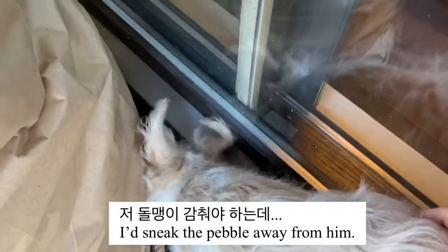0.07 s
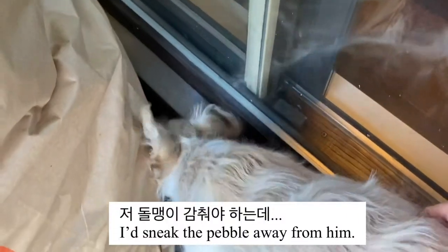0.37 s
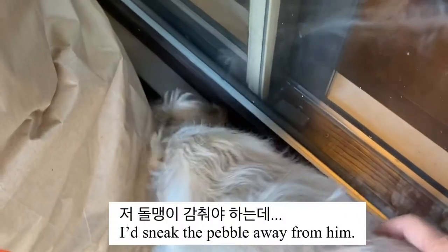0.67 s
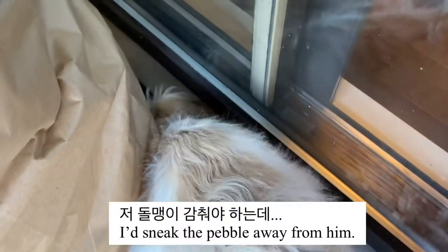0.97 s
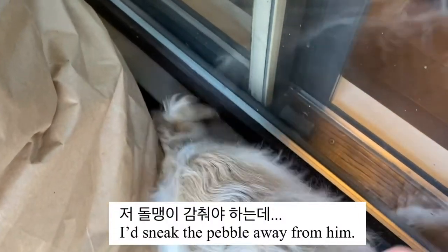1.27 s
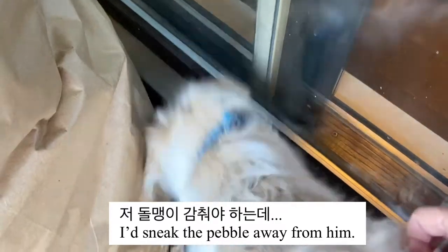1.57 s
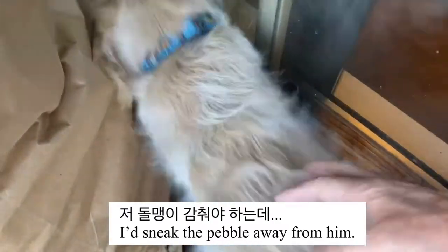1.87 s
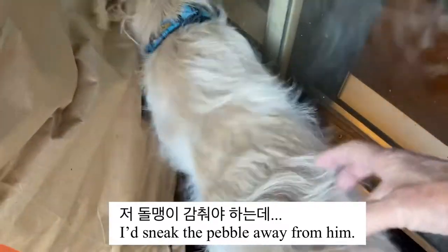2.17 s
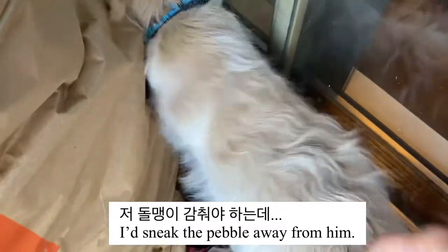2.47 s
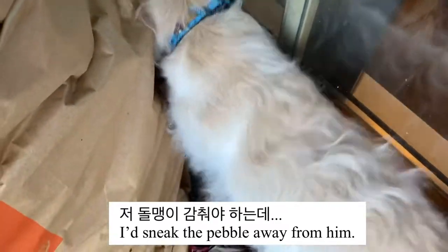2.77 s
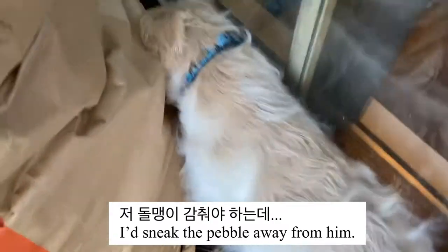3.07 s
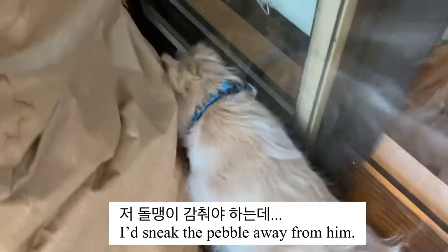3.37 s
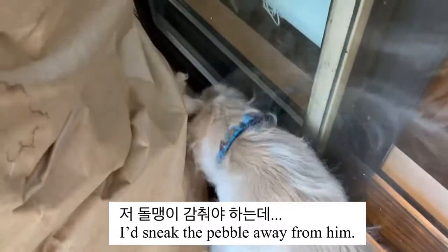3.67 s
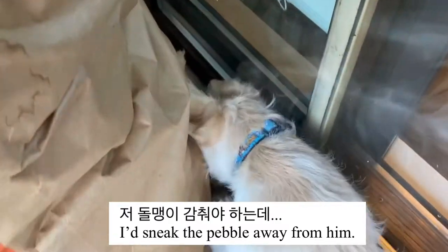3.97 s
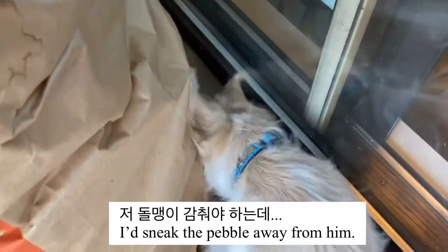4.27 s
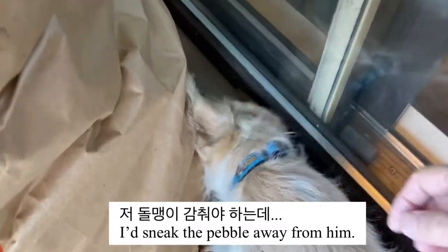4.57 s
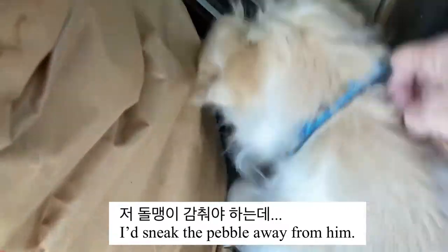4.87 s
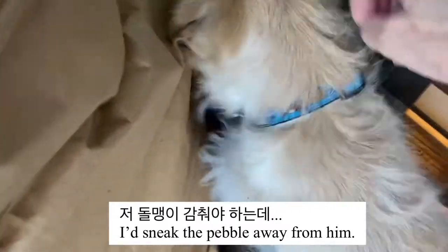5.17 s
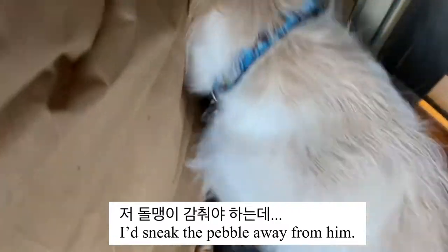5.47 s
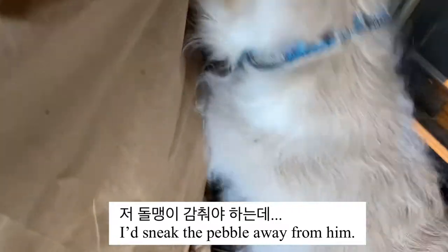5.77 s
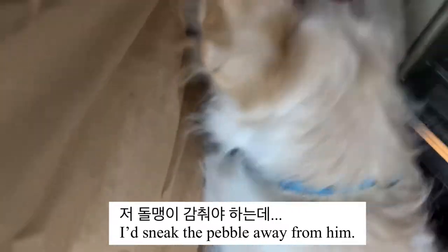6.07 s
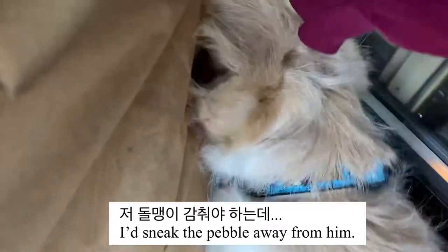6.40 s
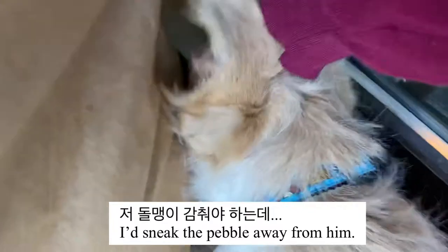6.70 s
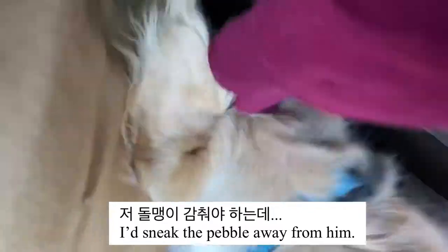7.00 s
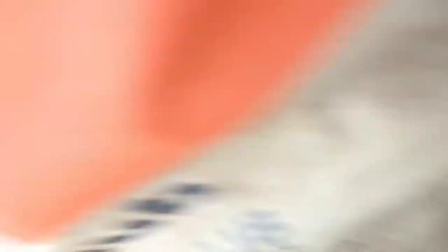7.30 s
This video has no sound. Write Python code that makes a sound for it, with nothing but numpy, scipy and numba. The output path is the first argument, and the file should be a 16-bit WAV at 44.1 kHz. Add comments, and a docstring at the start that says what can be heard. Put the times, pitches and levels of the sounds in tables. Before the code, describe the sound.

A puppy squeezes between a glass door and a big paper bag, very close to a hand-held phone. The stiff paper rustles and crinkles in uneven bursts, with sharp pops, dull paw taps and low thumps, while fur hisses along it. The pushing starts lightly, grows busier, eases briefly, then peaks before softening. A few dull knocks sound, and a low rumble lies under the small room.

```python
"""Puppy behind a paper bag

A puppy squeezes and paws between a glass door and a big paper bag, right under a hand-held phone.
The stiff paper buckles with sharp pops, dull taps and low thumps, and crinkles and flaps when pushed.
Fur hisses along it. A few dull knocks sound, probably a pebble or claws on the door track.
A small room and a low rumble lie behind. The phone's two microphone ports hear it all slightly apart."""
import sys
import numpy as np
from scipy import signal
from scipy.fft import rfft, irfft, next_fast_len
from scipy.io import wavfile
from scipy.ndimage import uniform_filter1d
from numba import njit

SR = 44100
rng = np.random.default_rng(int(sys.argv[2]) if len(sys.argv) > 2 else 0)


def inscribe(sig):
    """Save sig as 16-bit PCM at rate SR to the path in sys.argv[1].

    A 1-D sig is mono; a 2-D sig holds one channel per row.
    Samples are clipped to [-1, 1] before scaling.
    """
    pcm = np.round(np.clip(np.atleast_2d(sig).T, -1, 1) * 32767)
    wavfile.write(sys.argv[1], SR, pcm.astype(np.int16))


N = 332514
TIME_S = np.arange(N) / SR
TOP_HZ = 15800
WALL_HZ, WALL_BEND_OCT = [805, 1415, 2090, 3910], .16  # bag wall resonances at rest; rms slide

# sharp paper pops and dull knocks, the knocks probably a pebble or claws on the door track:
# t/s, level/dB, treble re level/dB, burst length/s, ring f/Hz
POPS_AND_KNOCKS = [(.3056, -39.5, 2, 0.0012, 347), (.341, -48, 5, 0.00087, 890),
                   (.4723, -36, 3, 0.003, 596), (.7788, -34, -5.5, 0.002, 910),
                   (.8663, -40, -1, 0.0019, 540), (1.0482, -43.5, -44, 0.0011, 755),
                   (1.1516, -35.5, -48, 0.0052, 1163), (1.228, -43.5, -43, 0.005, 530),
                   (1.4603, -48.5, 6, 0.0054, 1024), (1.5892, -30, -12, 0.0055, 1029),
                   (1.618, -34, -22, 0.0036, 1120), (1.644, -32.5, -4, 0.007, 1270),
                   (1.6653, -36.5, 0.5, 0.0021, 396.6), (1.993, -31, -9, 0.0032, 616),
                   (2.0117, -24, -8, 0.0037, 1755), (2.0165, -26, -34, .009, 995),
                   (2.0734, -26, 0, 0.002, 796), (2.214, -38, -14, 0.0016, 1700),
                   (2.2414, -35, -9, 0.0055, 300), (2.351, -37, -12, 0.005, 690),
                   (2.656, -37.5, -20, 0.0025, 412), (2.7206, -28.5, -13, 0.0052, 900),
                   (2.7865, -32, -4, 0.0057, 407), (3.046, -38, -12, 0.0021, 1280),
                   (3.1043, -29, -16, 0.0045, 590), (3.1519, -32.5, 4, 0.0019, 390),
                   (3.191, -39, -3, .003, 1508), (3.505, -43, 7, 0.0039, 507),
                   (3.5375, -40, 7.5, 0.0069, 782), (3.592, -41.5, -25, 0.0039, 520),
                   (3.7005, -44, -15, 0.0053, 747), (3.9059, -43, -53, 0.0018, 625),
                   (4.292, -46, -6.5, 0.0013, 1293), (4.3234, -37, -26, 0.0058, 653),
                   (4.358, -46.5, -1, 0.0046, 1560), (4.4187, -42.5, 4, 0.0043, 943),
                   (4.6073, -33, -23, 0.0028, 656), (4.7357, -34, -6.5, 0.0034, 2205),
                   (4.876, -28.5, -6, 0.0045, 1220), (4.902, -35, -2, 0.0037, 1506),
                   (4.918, -29.5, 0, 0.0021, 520), (4.9496, -25, -15, 0.0063, 1491),
                   (4.9713, -29, 4.5, 0.0022, 526), (5.0207, -32.5, -3, 0.0015, 380),
                   (5.092, -27, -10.5, 0.0043, 674), (5.1204, -17, -9.5, 0.0034, 708),
                   (5.2171, -40, 5, 0.0022, 436), (5.2893, -35.5, -3, 0.0025, 2240),
                   (5.3356, -32, -6, 0.0028, 350.1), (5.5112, -19.5, -7, 0.003, 469),
                   (5.8318, -30.5, -20, 0.0037, 486.4), (6.2755, -31.5, -8.5, 0.0029, 1674),
                   (6.3654, -37, -35, 0.00089, 1090), (6.493, -36.5, -12, 0.0019, 1380),
                   (6.647, -48.5, 13.5, 0.0025, 374), (6.6787, -33, -5, 0.0015, 278),
                   (6.876, -43.5, 4.5, .003, 2330), (6.9194, -27.5, -6, 0.0033, 660),
                   (6.947, -33.5, -1.5, 0.0014, 640), (7.1257, -32.5, -15.5, 0.0028, 756)]
# paw pads landing on paper: t/s, level/dB, panel f/Hz
PAW_TAPS = [(.521, -37.5, 629), (.627, -35, 693), (.726, -36, 636), (.987, -42, 516.8), (1.967, -29, 762.5),
            (3.07, -24.5, 637.8), (4.046, -44, 769), (5.0, -23, 885), (5.209, -27.5, 644),
            (5.761, -40, 830), (5.957, -40, 780)]
# bumps against the bag wall: t/s, peak level/dB, f/Hz
WALL_THUMPS = [(.561, -20, 98), (0.649, -22.5, 348), (1.596, -14, 76), (1.672, -16, 80),
               (2.244, -15.5, 147), (2.327, -18, 228), (2.723, -9.5, 147), (2.769, -10, 144),
               (3.062, -15.5, 106.9), (3.204, -11.5, 94.06), (3.295, -17, 160), (4.444, -24.5, 344),
               (4.892, -10, 103.9), (4.972, -7, 107), (5.215, -8.5, 136.6), (5.266, -12.5, 102.9),
               (5.478, -6.5, 191), (5.514, -1.5, 99.4), (6.5, -22, 314.6), (6.652, -22, 417.7),
               (6.674, -11.5, 245), (6.684, -14, 84), (6.795, -22.5, 307), (7.289, -20.5, 83.3),
               (7.323, -18.5, 66.6)]
# shoves and paw strokes: t/s, swell/s, length/s, crinkle level/dB, fur level/dB
BAG_PUSHES = [(0.235, 0.018, 0.31, -45, -48.5), (0.549, 0.02, 0.19, -44, -48.5),
              (0.998, 0.027, 0.31, -48.5, -52), (1.077, 0.062, 0.119, -44.5, -41),
              (1.297, 0.03, 0.25, -59, -56), (1.582, 0.013, .09, -33, -37.5),
              (1.684, 0.014, 0.053, -40, -41.5), (1.842, 0.02, 0.1, -38, -43.5),
              (1.921, 0.021, .09, -34.5, -40), (2.013, 0.0087, .07, -40.5, -47),
              (2.123, 0.017, .07, -40, -47.5), (2.223, 0.069, .13, -36.5, -41.5),
              (2.461, 0.022, 0.049, -38, -42.5), (2.547, 0.032, 0.32, -40.5, -46.5),
              (2.634, .02, .15, -36.5, -44), (2.863, 0.0071, 0.098, -37.5, -42.5),
              (3.038, 0.014, 0.049, -28.5, -35), (3.158, 0.018, 0.068, -37.5, -43),
              (3.232, 0.019, 0.081, -39.5, -48), (3.395, 0.03, 0.14, -37.5, -43.5),
              (3.627, .015, 0.02, -51, -45.5), (3.69, 0.015, 1.0, -59, -64),
              (3.828, 0.059, .06, -45.5, -47.5), (3.916, 0.035, 0.06, -48.5, -49),
              (4.019, 0.056, 0.0475, -43.5, -39.5), (4.422, 0.033, 0.041, -47.5, -43),
              (4.701, 0.027, 0.023, -48, -39.5), (4.791, 0.043, 0.0795, -63, -43),
              (4.867, 0.013, 0.08, -32.5, -34), (4.938, 0.019, 0.064, -26.5, -31.5),
              (5.062, 0.028, 0.075, -30.5, -34.5), (5.156, 0.078, 0.35, -33, -38.5),
              (5.451, 0.022, .1, -32.5, -37.5), (5.586, 0.031, 0.209, -48.5, -45.5),
              (5.808, 0.014, .44, -51, -48.5), (6.262, .02, 0.26, -44, -46),
              (6.546, 0.065, 0.1347, -43.5, -46), (6.694, 0.1, 0.168, -46.5, -44),
              (6.9, .026, 0.2, -48.5, -45.5), (7.083, 0.056, 0.15, -55, -50.5),
              (7.249, 0.076, 0.066, -46.5, -40.5)]
# smooth brushing to jerky shoving: crinkle level/dB, level scatter/dB, crease size spread/dB
JERK_BY_LEVEL = [(-39, 2, 2.9), (-31, 3.2, 5)]
# paper panel modes, also used for the knocks: f/main f, level/dB
RING_MODES = [(0.597, -4.5), (1, 0), (1.451, -18.5)]
# air modes inside the bag: f/Hz, level re direct/dB
BAG_AIR_MODES = [(468, -9), (830, -3), (1150, -5)]
# modes of the gap between bag, door and phone: f/Hz, level re direct/dB
GAP_MODES = [(1750, -18.5), (3390, -10.5), (4140, -10.5)]
# source spectra: f/Hz, relative density/dB
CRACK_SPECTRUM = [(300, -20), (700, 5.5), (1500, 7), (2900, 1), (4100, 2), (5500, -5), (9000, -20),
                  (15000, -26)]
CRINKLE_SPECTRUM = [(200, -19), (500, 4.5), (1100, -3), (2000, -10.5), (3000, -11.5), (4200, -18),
                    (7000, -26), (15000, -55)]
FLAP_SPECTRUM = [(60, -14), (130, -4.5), (250, -2), (370, -12.5), (1500, -47.5)]
FUR_SPECTRUM = [(800, 10), (4200, 1.5), (6500, 9), (11000, -1.5), (15000, 0.5)]
RUMBLE_SPECTRUM = [(20, -39), (36, -9), (52, 1), (100, 1), (140, -4), (220, -20), (1500, -45.5)]
# rumble of room and held phone: t/s, level/dB
RUMBLE_LEVELS = [(0.0, -39.5), (3.5, -30.5), (3.74, -39.5), (4.7, -37.5), (5.4, -23.5), (5.7, -35),
                 (7.35, -33.5)]
# left port behind right: f/Hz, phase/rad
PORT_LAG_RAD = [(200, 0), (1800, .1), (3500, .55), (5200, 1.2), (8400, 3), (12000, 3.2), (15500, 5.2)]
# left port over right: f/Hz, level/dB
PORT_TILT_DB = [(250, 0), (550, 2), (3500, 1.5), (8000, 0)]
# scattered sound, unlike at the two ports: f/Hz, level re direct/dB
PORT_SCATTER_DB = [(100, -58), (280, -17.5), (550, -9), (4800, -7), (9000, -56), (12000, -33), (15000, -16)]


def pops_and_knocks(crack_db=1, treble_db=1, cycles=0.74, tail_db=-19, tail_s=0.0096, size=4096):
    """Sharp pops of buckling paper and dull knocks: each a grainy burst with a brief ring."""
    out, t = np.zeros((2, N)), np.arange(size) / SR
    for start_s, db, bright_db, burst_s, hz in POPS_AND_KNOCKS:
        burst = rng.standard_normal((2, size)) * np.exp(.5 * rng.standard_normal(size))
        decay = np.exp(-(t / burst_s) ** 2) + undb(tail_db) * np.exp(-t / tail_s)
        burst *= (1 - np.exp(-2 * t / burst_s)) * decay
        burst += np.roll(burst, int(SR / hz * rng.uniform(0.55, 1)), axis=-1) / 2  # comb colouring
        crack = colour(burst, CRACK_SPECTRUM)
        body = band(crack, 260, 3600 * 2 ** (bright_db / 40))
        body *= burst_gain(band(body, 600, 6900), db + crack_db)
        treble = band(band(crack, 7100, TOP_HZ), 5950, TOP_HZ)
        treble *= burst_gain(treble, db + bright_db + treble_db)
        ring = 0
        for ratio, mode_db in RING_MODES:
            mode = np.sin(2 * np.pi * (ratio * hz * t + rng.random((2, 1))))
            ring_s = cycles / (ratio * hz) + burst_s / 2
            ring += undb(mode_db) * mode * np.exp(-t / ring_s)
        ring *= 1 - np.exp(-2 * hz * t)
        ring_db = db + 4 - 6.5 * np.log2(hz / 603) - 0.18 * bright_db  # low, dull ones ring more
        add(out, start_s, body + treble + ring * burst_gain(ring, ring_db))
    return out


def taps(scuff_db=-6, cycles=1.3, contact_s=0.004, size=4096):
    """A pad presses softly: the panel swings a few times under a short, dull scuff."""
    out, t = np.zeros((2, N)), np.arange(size) / SR
    for start_s, db, hz in PAW_TAPS:
        swing = sum(undb(mode_db) * np.sin(2 * np.pi * ratio * hz * t) * np.exp(-ratio * hz * t / cycles)
                    for ratio, mode_db in RING_MODES)
        swing *= 1 - np.exp(-t / contact_s)
        scuff = band(rng.standard_normal((2, size)) * t * np.exp(-2 * t / contact_s), 300, 1500)
        add(out, start_s, swing * burst_gain(swing, db) + scuff * burst_gain(scuff, db + scuff_db))
    return out


def thumps(rise_cycles=0.7, sag_cycles=0.11, size=6000):
    """The bag wall bulges and settles in a few swings, its pitch sagging as it slackens."""
    out, t = np.zeros(N), np.arange(size) / SR
    for start_s, db, hz in WALL_THUMPS:
        age = hz * t / rise_cycles
        bulge = (age * np.exp(1 - age)) ** 2
        phase_cycles = hz * t + sag_cycles * (1 - np.exp(-age))
        add(out, start_s, undb(db) * bulge * np.sin(2 * np.pi * phase_cycles))
    return out


def push_levels(release_s=.042, rest_db=(-62, -63.5)):
    """Crinkle and fur levels in dB: each push swells, holds and dies back to a faint stirring."""
    power, t = np.zeros((2, N)), np.arange(2 * SR) / SR
    for start_s, swell_s, length_s, *levels_db in BAG_PUSHES:
        shape = np.minimum(t / swell_s, 1) * np.exp(-np.maximum(t - length_s, 0) / release_s)
        add(power, start_s, np.outer(undb(levels_db), shape) ** 2)
    return 10 * np.log10(power + undb(rest_db)[:, None] ** 2)


def creases(rate_hz, spread_db, cycles=2.8, slip_s=.001, flicker_db=2, band_scatter_db=4, octaves=7):
    """Creases slip at random; each rings a few cycles in every octave, at uneven levels."""
    slips = np.flatnonzero(rng.random(N) < rate_hz / SR)
    size_db = spread_db[slips] * (np.minimum(rng.exponential(size=len(slips)), np.pi) - 2)
    out = 0
    for hz in TOP_HZ / np.sqrt(2) / 2 ** np.arange(octaves):
        energy = np.zeros(N)
        energy[slips] = undb(size_db + band_scatter_db * rng.standard_normal(len(slips))) ** 2
        for tau_s in (slip_s / 4, slip_s + cycles / hz):  # rise, fall
            energy = signal.lfilter([1], [1, -np.exp(-2 / (tau_s * SR))], energy)
        envelope = unit_rms(np.sqrt(energy) * undb(flicker_db * walk(30)))
        out += band(envelope * rng.standard_normal((2, N)), hz / np.sqrt(2), hz * np.sqrt(2))
    return out


def rustle(crinkle_db, fur_db, base_rate_hz=330, rate_doubling_db=30, flap_over_crinkle_db=7):
    """Harder pushing creases the paper faster; loose panels flap; sliding fur hisses."""
    rate_hz = base_rate_hz * 2 ** ((crinkle_db - crinkle_db.mean()) / rate_doubling_db)
    level_db, scatter_db, spread_db = np.transpose(JERK_BY_LEVEL)
    jerk = undb(np.interp(crinkle_db, level_db, scatter_db) * walk(45))
    slips = creases(rate_hz, np.interp(crinkle_db, level_db, spread_db))
    crinkle = unit_rms(colour(slips, CRINKLE_SPECTRUM) * jerk)
    flap = unit_rms(colour(rng.standard_normal((2, N)) * undb(2 * walk(60)), FLAP_SPECTRUM))
    fur = unit_rms(colour(rng.standard_normal((2, N)), FUR_SPECTRUM) * np.sqrt(jerk))
    return (crinkle + flap * undb(flap_over_crinkle_db)) * undb(crinkle_db) + fur * undb(fur_db)


def flexing_wall(x, q=8.0, ring_db=-3.5, sway_db=3.5, bend_rate_hz=9):
    """The rubbed wall bends, so its resonances slide in pitch and come and go."""
    out = x
    for rest_hz in WALL_HZ:
        hz = rest_hz * 2 ** (WALL_BEND_OCT * walk(bend_rate_hz))
        ring = np.array([resonate(row, hz, q) for row in x])
        out = out + ring * undb(ring_db + sway_db * walk(bend_rate_hz))
    return out


def cavity(x, modes, q, drift_oct=0):
    """Enclosed air rings briefly; soft walls let its modes drift."""
    drift = 2 ** (drift_oct * walk(2.2))
    return x + np.array([sum(undb(db) * resonate(row, hz * drift, q) for hz, db in modes) for row in x])


def rumble(hum_hz=92, hum_db=-43.5):
    """Low noise of room and held phone, with a wavering hum."""
    noise = unit_rms(colour(rng.standard_normal((1, N)), RUMBLE_SPECTRUM, size=8192)[0])
    level_db = np.interp(TIME_S, *np.transpose(RUMBLE_LEVELS))
    hum = np.sin(2 * np.pi * hum_hz * TIME_S + .5 * walk(18)) * undb(hum_db + 2 * walk(24))
    return noise * undb(level_db) + hum


def room_response(t60_s=0.25):
    """Small room: a band-limited, decaying spray of reflections."""
    t = np.arange(SR // 2) / SR
    spray = rng.standard_normal(len(t)) * np.exp(-np.log(1000) * t / t60_s)
    return band(spray / np.sqrt(np.sum(spray ** 2)), 170, 4000)


def ports(direct, scattered, room_db=-27):
    """Direct sound reaches the left port later; door and floor scatter and room echo differ per port."""
    size = 2 * next_fast_len((N + SR) // 2)
    lag_rad, tilt_db = over_bins(PORT_LAG_RAD, size), over_bins(PORT_TILT_DB, size)
    share = undb(over_bins(PORT_SCATTER_DB, size))
    direct, scattered = rfft(direct, size), rfft(scattered, size)
    out = []
    for side in (1, -1):  # left, right
        near = (direct + side * share * scattered) / np.sqrt(1 + share ** 2)
        near *= undb(side * tilt_db / 2) * np.exp(-1j * side * lag_rad / 2)
        room = undb(room_db) * direct * rfft(room_response(), size)
        out.append(irfft(near + room)[:N])
    return np.array(out)


def undb(db):
    """Decibels to gain."""
    return 10 ** (np.asarray(db) / 20)


def unit_rms(x):
    """Scale to rms 1."""
    return x / np.sqrt(np.mean(x ** 2))


def burst_gain(x, db):
    """Gain that gives a burst the energy of 10 ms at this level."""
    return undb(db) * np.sqrt(SR / 100 / np.sum(x ** 2, axis=-1, keepdims=True))


def walk(rate_hz):
    """Random values joined by ramps, rms 1."""
    hold = int(SR / rate_hz)
    steps = np.repeat(rng.standard_normal(N // hold + 1), hold)
    return unit_rms(uniform_filter1d(steps, hold)[:N])


def add(track, start_s, sound):
    """Mix a sound into a track."""
    start = int(start_s * SR)
    track[..., start:start + sound.shape[-1]] += sound[..., :N - start]


def over_bins(table, size):
    """Frequency table interpolated onto FFT bins, in log f."""
    hz, value = np.transpose(table)
    return np.interp(np.log(np.arange(size // 2 + 1) * SR / size + 1), np.log(hz), value)


def colour(x, spectrum, size=2048):
    """Minimum-phase filter with the given spectrum."""
    cepstrum = irfft(np.log(undb(over_bins(spectrum, size))))
    cepstrum[1:size // 2] *= 2
    cepstrum[size // 2 + 1:] = 0
    impulse = irfft(np.exp(rfft(cepstrum)))
    return signal.oaconvolve(x, impulse[None])[:, :x.shape[1]]


def band(x, lo_hz, hi_hz):
    """Causal band-pass."""
    return signal.sosfilt(signal.butter(2, [lo_hz, hi_hz], "band", fs=SR, output="sos"), x)


@njit
def resonate(x, hz, q):
    """State-variable band-pass, gain 1 at its moving centre."""
    out, band_state, low_state = np.empty(len(x)), 0., 0.
    for i in range(len(x)):
        g = np.tan(np.pi * hz[i] / SR)
        passed = (band_state + g * (x[i] - low_state)) / (1 + g * (g + 1 / q))
        band_state = 2 * passed - band_state
        low_state += 2 * g * passed
        out[i] = passed / q
    return out


def scene():
    """Impacts and rubbing as two rows, direct and scattered; thumps and rumble join the direct row."""
    bursts = pops_and_knocks()
    impacts = cavity(bursts + taps(), BAG_AIR_MODES, q=18.0, drift_oct=WALL_BEND_OCT / 2)
    rubbing = flexing_wall(rustle(*push_levels()))
    direct, scattered = cavity(rubbing + impacts, GAP_MODES, q=6.0)
    glance = undb(-19) * band(bursts[1], 4000, TOP_HZ)  # off the glass, alike at both ports
    return ports(direct + thumps() + rumble(), scattered) + glance


def record(dry):
    """The phone rounds the loudest peaks and cuts the top."""
    lowpass = signal.ellip(8, .1, 60, TOP_HZ, fs=SR, output="sos")
    return signal.sosfiltfilt(lowpass, np.tanh(dry))


dry = scene()
out = record(dry)
inscribe(out)
```